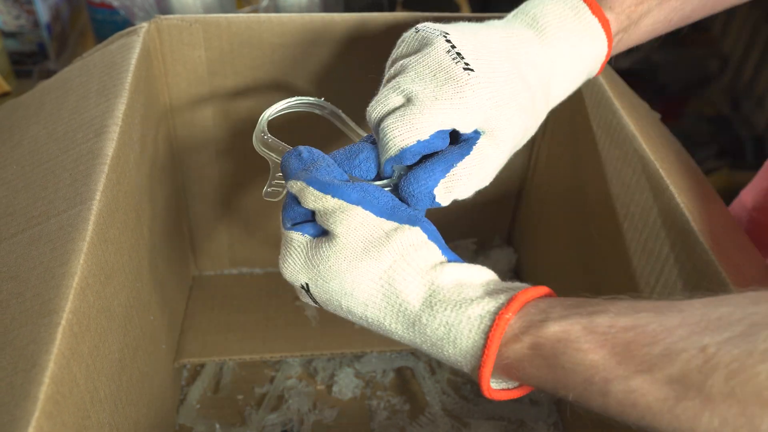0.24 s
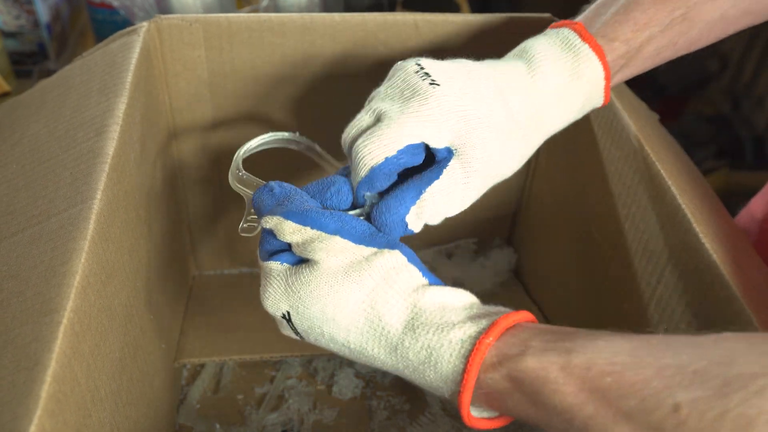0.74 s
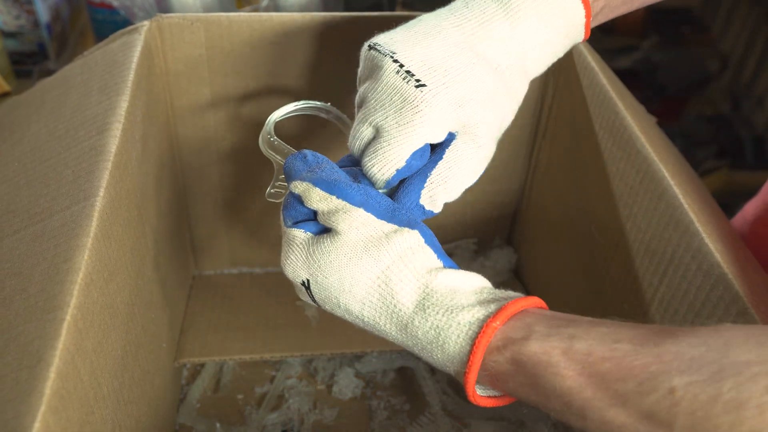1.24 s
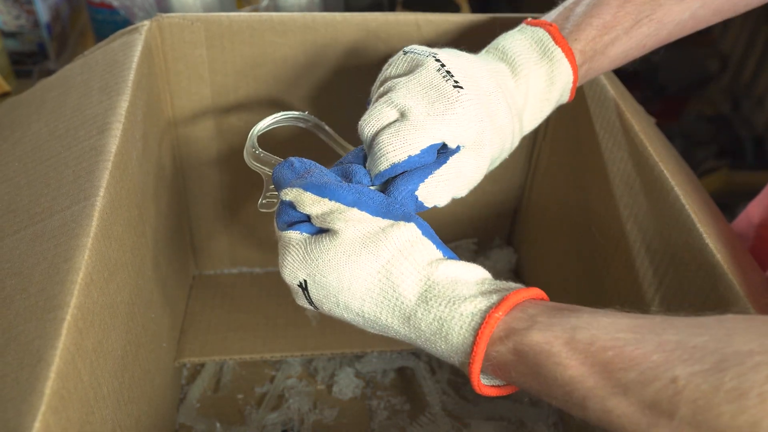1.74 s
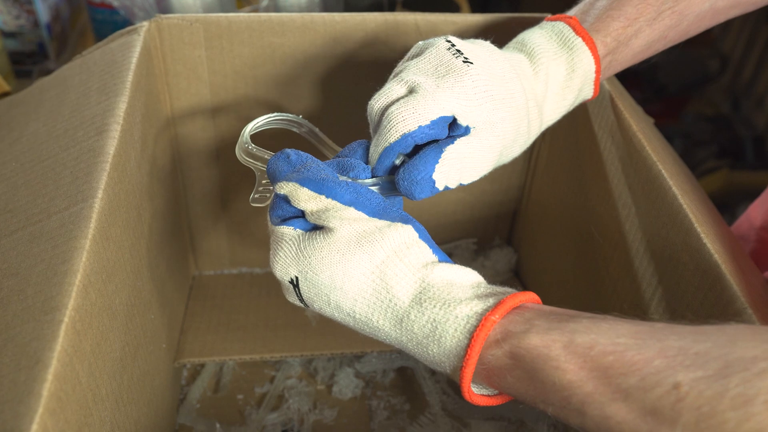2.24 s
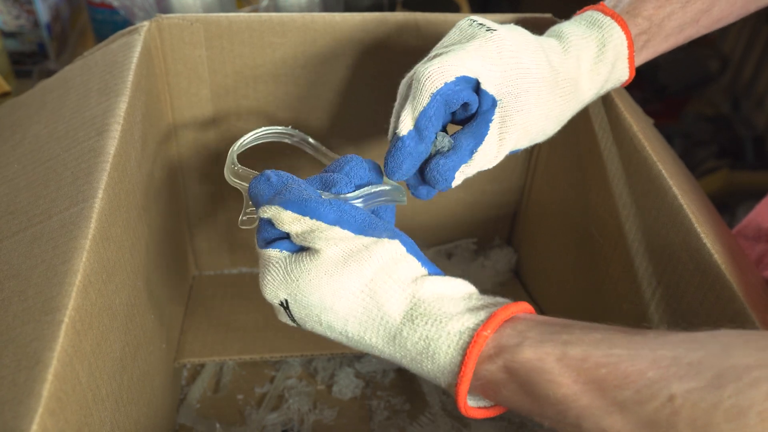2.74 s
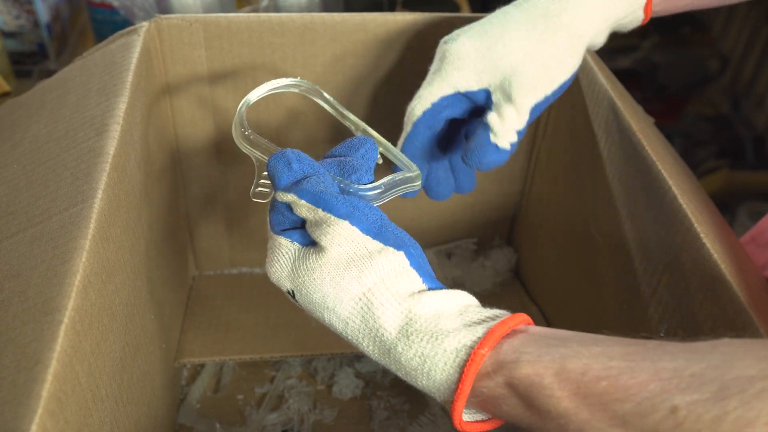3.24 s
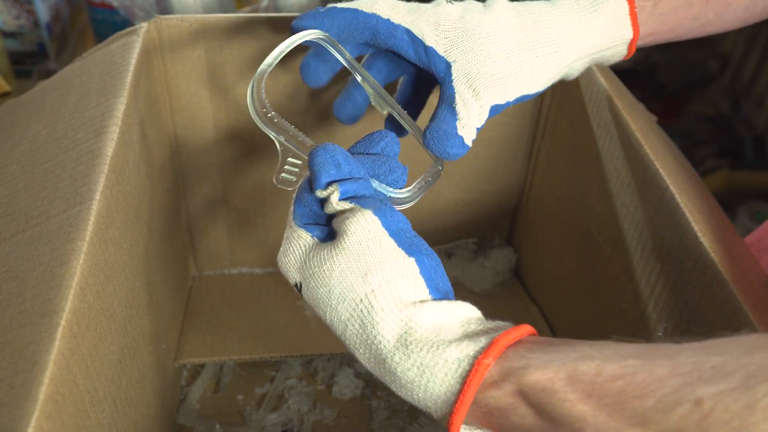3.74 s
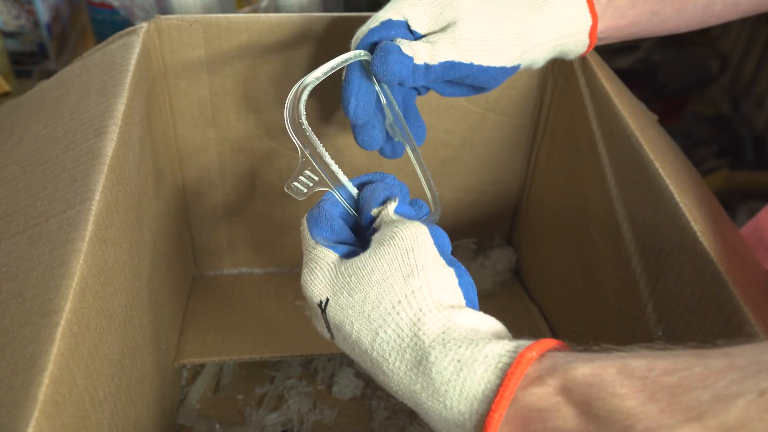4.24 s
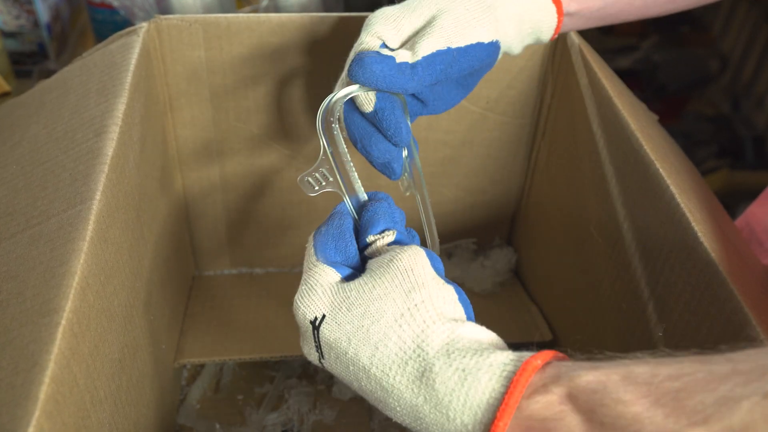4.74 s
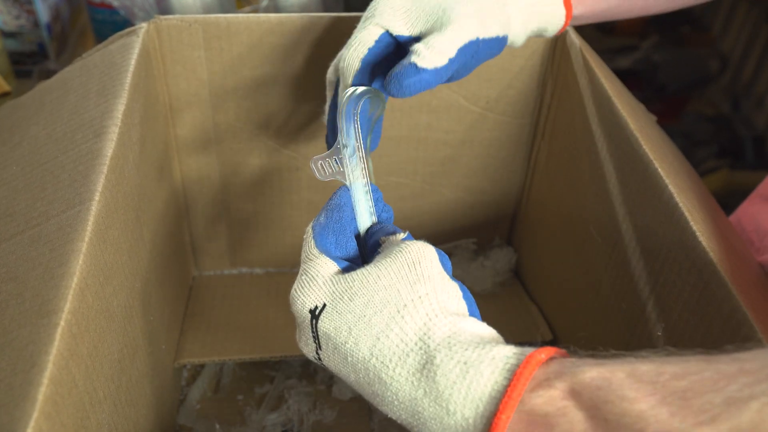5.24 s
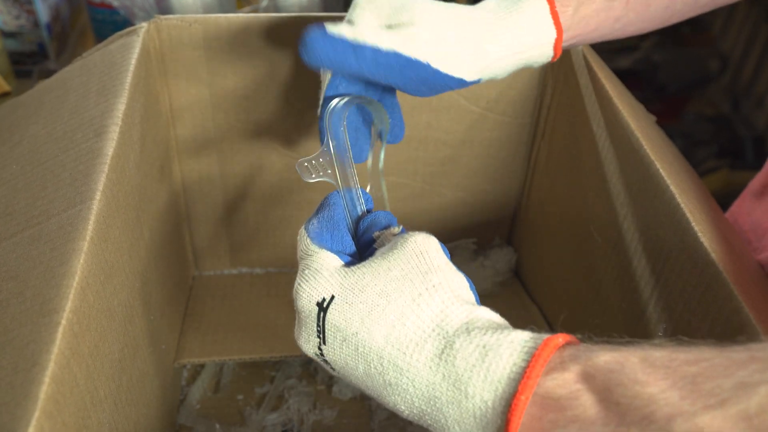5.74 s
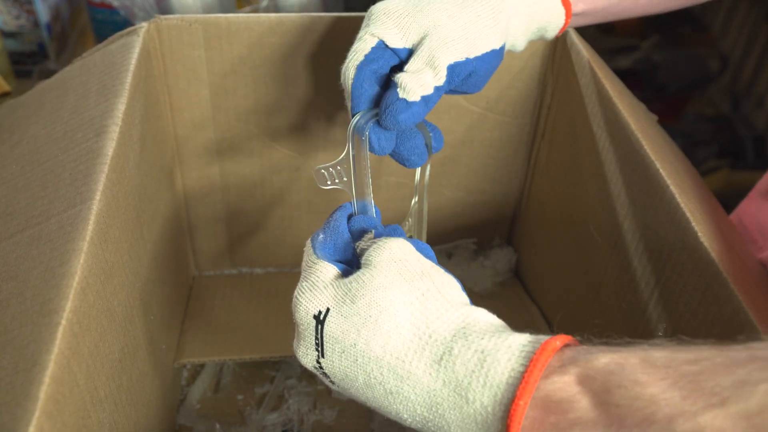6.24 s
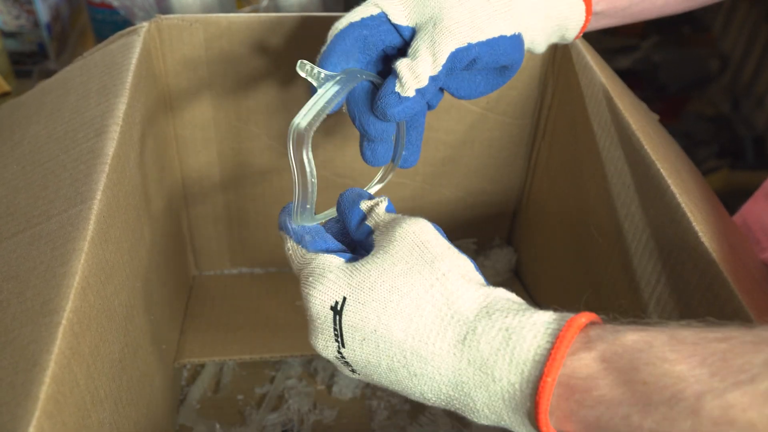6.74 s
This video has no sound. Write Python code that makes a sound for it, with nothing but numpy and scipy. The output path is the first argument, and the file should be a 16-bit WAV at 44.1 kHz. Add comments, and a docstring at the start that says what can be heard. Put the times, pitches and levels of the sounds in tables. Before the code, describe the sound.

Gloved hands break thin stiff plastic supports. Crumbs patter briefly into a box, a single snap cracks, then rapid bursts of very bright snaps follow around two and nearly three seconds. A loud boxy thud comes next with small bumps. The rest is scratchy stick-slip rubbing with dull clicks, strongest around five seconds. Heard close, slightly right of centre, with quick cardboard reflections and low room hush.

```python
"""Brittle resin supports crack off a printed frame in quick clusters: noise bursts excite strut and frame.
Gloved hands rub the frame by stick-slip, trains of tiny slips, and stubs tick and catch under the rubber.
Pieces knock on a cardboard box as bursts through its resonances; crumbs patter as random impulses.
Box echoes and a diffuse workshop tail surround the work, over filtered-noise room rumble and hiss."""
import sys
import numpy as np
from scipy import signal
from scipy.fft import rfft, irfft
from scipy.io import wavfile
from scipy.ndimage import uniform_filter1d

SR = 44100
rng = np.random.default_rng(int(sys.argv[2]) if len(sys.argv) > 2 else 0)


def put_to_file(sound):
    """Save the sound as 16-bit audio at rate SR, in the file named by the first command-line argument."""
    columns = np.atleast_2d(sound).T  # one column per channel
    safe = np.clip(columns, -1, 1)
    whole_steps = np.round(safe * 32767)
    wavfile.write(sys.argv[1], SR, whole_steps.astype(np.int16))


N = 308655
HZ = np.fft.rfftfreq(4096, 1 / SR)


def amp(db):
    """Logarithmic level: decibels to amplitude gain."""
    return 10 ** (np.asarray(db) / 20)


def unit(x):
    """Power normalization: scales to rms 1."""
    return x / np.sqrt(np.mean(np.abs(x) ** 2) + 1e-20)


def read(points, hz):
    """Logarithmic pitch scale: interpolates a table along log frequency."""
    f, value = np.transpose(points)
    return np.interp(np.log(hz + 1), np.log(f + 1), value)


def add(mix, s, sound):
    """Superposition: mixes a stereo sound in at s seconds."""
    part = mix[:, max(round(s * SR), 0):][:, :sound.shape[1]]
    part += sound[:, :part.shape[1]]


def shape(points):
    """Spectral envelope: a table in dB as a gain of unit power."""
    return unit(amp(read(points, HZ)))


def colour(x, gain):
    """Minimum-phase filtering: a causal response with a sharp attack and ringing afterwards."""
    cepstrum = irfft(np.log(np.maximum(gain, 1e-5)))
    # folding the cepstrum onto positive time makes the filter causal
    fold = 1 + np.sign(len(cepstrum) / 2 - np.arange(len(cepstrum)))
    fold[0] = 1
    response = irfft(np.exp(rfft(cepstrum * fold)))
    return signal.fftconvolve(x, response[None], axes=1)


def pair(size, likeness):
    """Interchannel coherence: white noise in two channels, alike by a table of frequencies."""
    a, b = rfft(rng.standard_normal((2, size)))
    hz = np.fft.rfftfreq(size, 1 / SR)
    angle = np.arccos(np.clip(read(likeness, hz), -1, 1)) / 2
    common, different = a * np.cos(angle), b * np.sin(angle)
    return irfft(np.array([common + different, common - different]), size)


def resonance(hz, width):
    """Damped resonance: gain of one band-pass mode."""
    return HZ * width / np.hypot(hz ** 2 - HZ ** 2, HZ * width)


def evenness(x):
    """Spectral whitening: gain that levels the broad chance bumps of a scatter."""
    power = (np.abs(rfft(x, 2 * len(HZ) - 2)) ** 2).mean(0)
    return unit(uniform_filter1d(power, size=21) ** -.5)


def swell(start, end, attack, release):
    """Amplitude envelope: rises from start, holds, and falls to silence at end; all in seconds."""
    t = np.arange(N) / SR
    return np.clip(np.minimum((t - start) / attack, (end - t) / release), 0, 1)


def slips(per_s, spread_db):
    """Random impulse process: sparse slips of either sign, spread exponentially in level."""
    size = amp(spread_db * np.minimum(rng.exponential(1, N), 4)) * rng.choice([-1, 1], N)
    return unit(size * (rng.random(N) < per_s / SR))[None]


# left-right likeness of the direct sound: frequency_hz, likeness (0-1)
DIRECT_LIKENESS = [(200, 1), (3000, 0.91), (8000, 0.94), (16000, 0.89)]


def burst(length, share):
    """Impulsive release: an instant crack and a scatter decaying over length s; white, energy 1."""
    t, share = np.arange(1024) / SR, np.clip(share, 0, 1)
    scatter = pair(len(t), DIRECT_LIKENESS) * np.exp(-t / length)
    # share is the part of the energy given to the scatter
    x = np.sqrt(1 - share) * (t == 0) + np.sqrt(2 * share) * scatter / np.linalg.norm(scatter)
    x = colour(x, evenness(x))[:, :len(t)]
    return np.sqrt(2) * x / np.linalg.norm(x)


# spectrum of the room noise: frequency_hz, level_db
HUSH_SPECTRUM = [(12, -37), (20, -2.5), (44, -0.5), (130, -3.5), (187, -10.5), (337, -11), (399, -15),
                 (527, -15.5), (1120, -19.5), (1260, -18), (1370, -18), (2260, -21.5), (7950, -29.5),
                 (10800, -24.5), (16000, -31.5)]
HUSH_DB = -55
# left-right likeness of the room noise and rumble: frequency_hz, likeness (0-1)
NOISE_LIKENESS = [(60, 1.0), (180, 0.95), (550, 0.27), (1650, 0.06), (4970, 0), (15000, 0)]


def hush():
    """Stationary filtered noise: a steady low rumble of the room with a faint hiss above it."""
    gain = amp(read(HUSH_SPECTRUM, np.fft.rfftfreq(N, 1 / SR)))
    return amp(HUSH_DB) * unit(irfft(rfft(pair(N, NOISE_LIKENESS)) * gain, N))


def rumble():
    """Resonantly filtered noise: a soft low rumble swells and fades after the cluster at 2 s."""
    level = amp(-59) * swell(start=2.13, end=2.66, attack=.04, release=0.071)
    return colour(pair(N, NOISE_LIKENESS) * level, unit(resonance(hz=208, width=120) ** 2))[:, :N]


# reverberation time of the workshop: frequency_hz, t60_s
ROOM_T60 = [(250, 0.38), (800, 0.45), (2000, 0.42), (5000, 0.42), (9000, 0.43), (15000, 0.36)]
# spectrum of the room tail: frequency_hz, level_db
ROOM_SPECTRUM = [(200, -8), (900, -6), (2000, -9), (4000, -5), (7000, -4), (11000, -2), (16000, -4.5)]
# left-right likeness of diffuse sound: frequency_hz, likeness (0-1)
ROOM_LIKENESS = [(200, 1), (1500, 0.78), (3500, 0.49), (7000, 0.071), (16000, 0.046)]


def room_tail():
    """Exponential reverberation: a diffuse tail in which each frequency dies at its own speed."""
    t = np.arange(SR * 6 // 10) / SR
    hz, at, z = signal.stft(pair(len(t), ROOM_LIKENESS), SR, nperseg=256)
    decay = np.log(1000) / read(ROOM_T60, hz)[:, None]
    level = amp(read(ROOM_SPECTRUM, hz)[:, None])
    # the root keeps the tail's energy independent of its decay time
    z = z * level * np.exp(-decay * at) * np.sqrt(2 * decay / SR)
    onset = 1 - np.exp(-t / 0.0043)
    return signal.istft(z, SR, nperseg=256)[1][:, :len(t)] * onset


# echoes from the box walls: nominal delay_s, gain_left, gain_right
WALL_ECHOES = [(.0022, 0.12, 0.46), (.0051, 0.2, 0.24), (.0069, 0.25, 0.26), (.0094, 0.16, 0.15),
               (0.015, .1, .1), (.021, .07, .08)]


def box_echoes():
    """Early reflections: direct sound, wall echoes and scatter for one position of the hands."""
    t = np.arange(2048) / SR
    scatter = pair(len(t), ROOM_LIKENESS) * t * np.exp(-t / 0.0013)
    response = amp(0.5) * scatter / np.linalg.norm(scatter[0])
    response[:, 0] += 1  # direct sound
    for delay, left, right in WALL_ECHOES:
        moved_delay = delay * rng.uniform(.94, 1.06)
        add(response, moved_delay, np.array([[left], [right]]))
    return colour(response, evenness(response))


def space(x):
    """Moving source: the hands keep moving, so echoes blend between three positions."""
    out = np.zeros((2, N))
    position = np.arange(N) / SR * 13  # 13 positions per second
    for k in range(3):
        weight = np.maximum(1 - np.abs((position + k) % 3 - 1), 0)
        add(out, 0, signal.oaconvolve(x * weight, box_echoes(), axes=1))
        # unrelated tails add in power, so they blend by the root
        add(out, 0, signal.oaconvolve(x * np.sqrt(weight), room_tail(), axes=1))
    return out


# resonances of the box: frequency_hz, width_hz, level_db
BOX_MODES = [(375, 40, -11), (590, 50, -6), (853, 24, -2), (1060, 60, -11), (1840, 45, -11)]


def box_ring():
    """Modal resonance: the panels and the air of the box lift a few narrow bands."""
    return 1 + sum(amp(db) * resonance(hz, width) for hz, width, db in BOX_MODES)


# showers of crumbs into the box: start_s, end_s, level_db
SPILLS = [(0.0, 0.12, -41), (0.102, 0.324, -53), (0.83, 0.972, -55.5), (3.393, 3.476, -47)]
# spectrum of crumbs on cardboard: frequency_hz, level_db
CRUMBS = [(80, -26), (250, 1.5), (380, -5), (560, 1), (780, -2.5), (1100, -8.5), (2000, -12), (4000, -20.5),
          (16000, -33)]


def crumbs():
    """Random impacts: crumbs patter on the bottom of the box, strong at first, then fading."""
    flow = sum(amp(db) * swell(start, end, attack=0.013, release=end - start) for start, end, db in SPILLS)
    return colour(slips(per_s=1000, spread_db=3) * flow, unit(shape(CRUMBS) * box_ring()))[:, :N]


# dull knocks, pieces landing on the cardboard or bumps of the hands: start_s, level_db, tilt_db_per_octave
KNOCKS = [(0.0154, -21, 5), (0.034, -31, -3), (0.049, -32, 13), (0.068, -28, -4), (1.3218, -38, -6),
          (2.160, -28, -9), (2.170, -26, -10), (2.829, -23, -8.5), (3.029, -22, -2.5), (3.2720, 7, 2.5),
          (3.2879, -2.5, -0.5), (3.3900, -16.5, 2.5), (3.4049, -16, -5), (3.4184, -16.5, 3),
          (3.524, -29.5, -22), (3.6928, -19.5, 1), (3.699, -20, -3.5), (4.3, -28, -9), (4.941, -18.5, -4.5),
          (5.528, -22, -2.5), (5.640, -20.5, -2), (6.535, -20, 2)]
# spectrum of cardboard: frequency_hz, level_db
CARDBOARD = [(60, -36), (200, -16.5), (350, -6), (550, -7.5), (850, 1), (1200, -3.5), (1800, 2), (2400, -3),
             (3700, -16), (5500, -16.5), (9000, -21.5), (16000, -37)]


def knocks():
    """Impact excitation: short bursts sound through the box, each with its own brightness."""
    out = np.zeros((2, N))
    for s, db, tilt_db in KNOCKS:
        tilt = amp(tilt_db * np.log2(np.maximum(HZ, 200) / 1000))
        gain = unit(shape(CARDBOARD) * box_ring() * tilt)
        add(out, s, amp(db) * colour(burst(length=.001, share=.55), gain))
    return out


# strokes of a glove, brief and firm or long and light: start_s, end_s, rasp_db, fizz_db
STROKES = [(0.0, 0.261, -59.5, -63.5), (0.503, 0.705, -80, -73), (0.73, 0.954, -59, -62),
           (0.96, 1.246, -71, -78), (1.253, 1.313, -64, -88), (2.467, 2.559, -59.5, -70),
           (2.607, 2.72, -67, -76), (3.06, 3.208, -58.5, -72), (3.505, 3.543, -74, -57),
           (3.678, 3.723, -56, -55.5), (3.694, 3.917, -63, -72), (3.916, 3.988, -56, -51),
           (3.943, 4.397, -53, -58.5), (4.247, 4.31, -47, -62), (4.401, 4.467, -51.5, -51.5),
           (4.514, 4.828, -57, -61), (4.828, 4.893, -53.5, -52), (4.88, 4.972, -46.5, -45),
           (4.97, 5.05, -43.5, -53), (5.065, 5.25, -60, -71), (5.274, 5.879, -62, -71),
           (5.654, 5.755, -49.5, -50.5), (5.873, 5.914, -48.5, -55), (5.947, 6.038, -54.5, -46),
           (6.127, 6.206, -56, -56.5), (6.184, 6.995, -64, -69.5), (6.423, 6.481, -48.5, -50),
           (6.492, 6.618, -48.5, -51), (6.905, 6.957, -53.5, -49.5)]


def sliding():
    """Friction drive: strength of rasp and fizz as the gloves speed up, slide and stop."""
    rasp = np.zeros(N)
    fizz = np.full(N, amp(-66.5))  # the glove fizzes faintly even while it only holds
    for start, end, rasp_db, fizz_db in STROKES:
        speed = swell(start, end, attack=0.019, release=0.017)
        rasp += amp(rasp_db) * speed
        fizz += amp(fizz_db) * speed
    return rasp, fizz


# spectrum of coarse friction: frequency_hz, level_db
RASP = [(100, -29), (400, -8), (800, -4), (1400, -1.5), (2200, 2.5), (3000, -5), (4200, -8), (8000, -9),
        (16000, -29.5)]
# spectrum of fine friction: frequency_hz, level_db
FIZZ = [(500, -32), (2500, 1), (4000, -1.5), (5500, 0), (8000, -1), (10000, -3.5), (13000, -4.5),
        (16000, -8.5)]


def rubbing(rasp, fizz):
    """Stick-slip friction of rubber on resin: coarse slips rasp in the frame, fine ones fizz."""
    out = np.zeros((2, N))
    # the rubber catches and frees every few milliseconds, so the slips come in clumps
    wander = signal.oaconvolve(rng.standard_normal(N), signal.windows.hann(300), "same")
    clumps = unit(amp(3.5 * unit(wander)))
    coarse = clumps * slips(per_s=2500, spread_db=0.0)
    fine = clumps * np.vstack([slips(per_s=12000, spread_db=.5) for _ in range(2)])
    add(out, 0, colour(coarse * rasp, shape(RASP)))
    add(out, 0, colour(unit(coarse + 0.79 * fine) * fizz, shape(FIZZ)))
    return out


# spectrum of cracking resin: frequency_hz, level_db
CRACK = [(100, -51), (700, -44), (1500, -5.5), (3000, -5), (4000, 0), (5500, 8.5), (9000, 9.5), (12000, 4),
         (14500, 8.5), (16000, -6)]
# spectrum of the ringing frame: frequency_hz, level_db
FRAME = [(100, -23), (250, -20.5), (370, -10), (600, -17), (850, -4.5), (1100, -5), (1500, 1.5), (1900, 3),
         (2400, 0.5), (3200, -2), (5000, -10), (16000, -63)]


def tick(hz, crack_db):
    """Elastic release: a stub lets go of the glove with a small crack and its own dull ring."""
    ring = np.hypot(unit(resonance(hz, 0.63 * hz) ** 2), amp(-3.5) * shape(FRAME))
    gain = unit(np.hypot(ring, amp(crack_db) * shape(CRACK)))
    return colour(burst(length=0.0022, share=0.92), gain)


# larger stubs ticking under the glove: start_s, level_db, pitch_hz, crack_db (crack against ring)
TICKS = [(0.492, -22, 6100, -20), (0.498, -27, 1550, -4), (0.93, -27, 2380, 0), (0.995, -29.5, 1470, 3),
         (1.06, -27, 6070, -2), (1.189, -28.5, 2000, 6), (1.32, -21.5, 1440, -19), (1.536, -29, 1840, -16),
         (1.624, -30.5, 1570, -5), (1.766, -31, 6130, 2), (1.794, -26.5, 2460, -2),
         (1.883, -33.5, 2460, -6), (2.351, -23, 5330, -25), (2.509, -18.5, 6250, -1),
         (2.558, -24.5, 3070, -8), (2.577, -19, 6000, 0), (2.653, -18, 7300, 4), (2.695, -25, 8000, -5),
         (3.028, -20, 1700, -2), (3.185, -25, 1920, -6), (4.042, -23, 1773, 19), (4.1, -23.5, 1390, -13),
         (4.157, -23, 2520, -8), (4.277, -19, 1150, -11), (4.301, -13, 1880, -11), (4.357, -21, 1470, -19),
         (4.548, -20, 4550, -13), (4.592, -16.5, 7400, -3), (4.822, -19.5, 7600, -5),
         (4.905, -9.5, 2280, 0.5), (4.93, -15.5, 2170, -8), (4.985, -14, 2260, -15),
         (5.008, -15.5, 2850, -11), (5.024, -10.5, 1600, -14), (5.047, -8, 2550, -9.5),
         (5.125, -18.5, 3700, -5), (5.138, -15.5, 3640, 3), (5.589, -22, 3183, -4), (5.639, -14, 1930, 0),
         (5.737, -16, 2260, -20), (5.89, -14.5, 2200, -12), (5.948, -23.5, 1863, 10),
         (6.332, -24, 4540, -17), (6.389, -25, 1940, -3), (6.578, -24.5, 1440, -8),
         (6.682, -26.5, 2110, -4), (6.733, -22.5, 1814, -19), (6.979, -23, 1880, -18)]


def ticks():
    """Discrete elastic releases: the larger stubs tick one by one."""
    out = np.zeros((2, N))
    for s, db, hz, crack_db in TICKS:
        add(out, s, amp(db) * tick(hz, crack_db))
    return out


CATCHES_PER_S, CATCH_OVER_RASP_DB, CATCH_CRACK_DB = 36, 22.5, -9
CATCH_HZ, CATCH_SPREAD_OCTAVES = 2000, 0.21


def catches(rasp):
    """Random stick-slip events: smaller stubs catch by chance, as hard as the glove is rubbing."""
    out = np.zeros((2, N))
    chance, octaves = rng.random(N), rng.standard_normal(N)
    for at in np.flatnonzero((chance < CATCHES_PER_S / SR) & (rasp > 0)):
        hz = CATCH_HZ * 2 ** (CATCH_SPREAD_OCTAVES * octaves[at])
        add(out, at / SR, amp(CATCH_OVER_RASP_DB) * rasp[at] * tick(hz, CATCH_CRACK_DB))
    return out


# breaking struts: start_s, crack_db, pitch_hz (strut), strut_db, frame_db, splintering_s
SNAPS = [(0.7081, -3.5, 11200, 2.5, -15, 0.0013), (2.0112, 5.5, 8950, 2, -2.5, 0.0028),
         (2.0301, 5, 7200, -2, -34, 0.0006), (2.035, 1.5, 6800, 1.5, -35, 0.00078),
         (2.0421, 6.5, 6850, 1.5, -10.5, 0.00049), (2.0487, -7, 6960, -6, -24, 0.0009),
         (2.062, -11, 7000, -10, -33, .001), (2.7315, -24, 8800, -27, -47, 0.0011),
         (2.752, 5.5, 9450, -2, -4, 0.0018), (2.7698, 3, 9900, 0, -2, 0.0013),
         (2.828, -8.5, 9100, -19, -17, 0.0048), (2.8335, -16, 11100, -10.5, -20, 0.0048),
         (2.8545, -25, 4020, -18, -22, 0.0024), (2.913, -25, 5660, -10, -9, 0.0013),
         (2.9175, -13, 10000, -13.5, -14.5, 0.00084), (2.9306, -10, 4400, -19, -20, 0.0017),
         (2.937, -17, 8000, -30, -43, 0.0013)]


def snaps():
    """Brittle fracture: each strut cracks, rings for a few cycles and jolts the frame."""
    out = np.zeros((2, N))
    for s, crack_db, hz, strut_db, frame_db, length in SNAPS:
        crack = amp(crack_db) * shape(CRACK)
        strut = amp(strut_db) * unit(resonance(hz, .48 * hz) ** 2)
        frame = amp(frame_db) * shape(FRAME)
        gain = np.sqrt(crack ** 2 + strut ** 2 + frame ** 2)
        add(out, s, colour(burst(length, share=0.93), gain))
    return out


def scene():
    """Superposition of sources: the hands work slightly right of centre, over the room noise."""
    rasp, fizz = sliding()
    work = snaps() + knocks() + ticks() + rubbing(rasp, fizz) + crumbs() + catches(rasp)
    balance = amp([[-.3], [.3]])  # left, right
    return space(work) * balance + rumble() + hush()


def record(dry):
    """Soft saturation and band limiting: the sharpest cracks overload the input, then a low-pass."""
    ceiling = .62
    squashed = ceiling * np.tanh(dry / ceiling)
    low_pass = signal.firwin(127, 16200, window=("kaiser", 9), fs=SR)  # cutoff in Hz
    return signal.oaconvolve(squashed, low_pass[None], "same")


dry = scene()
out = record(dry)
put_to_file(out)
```